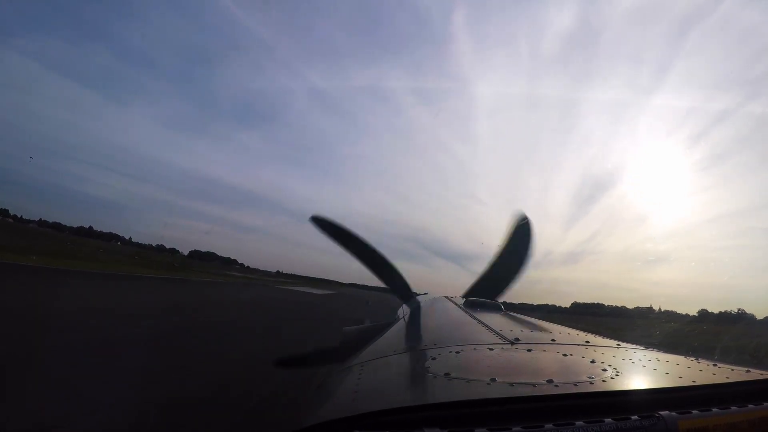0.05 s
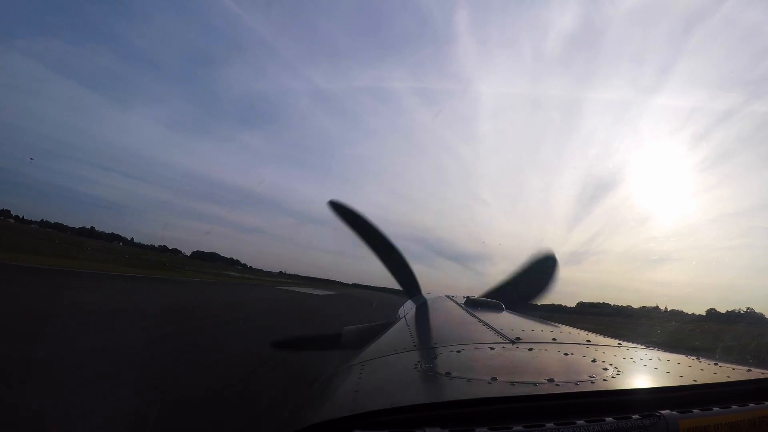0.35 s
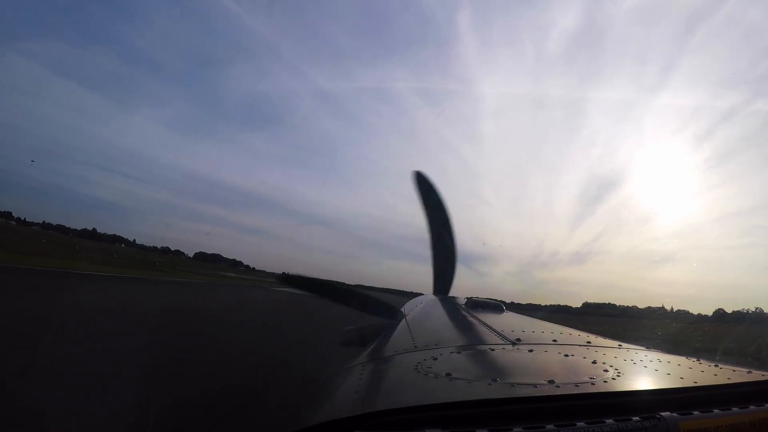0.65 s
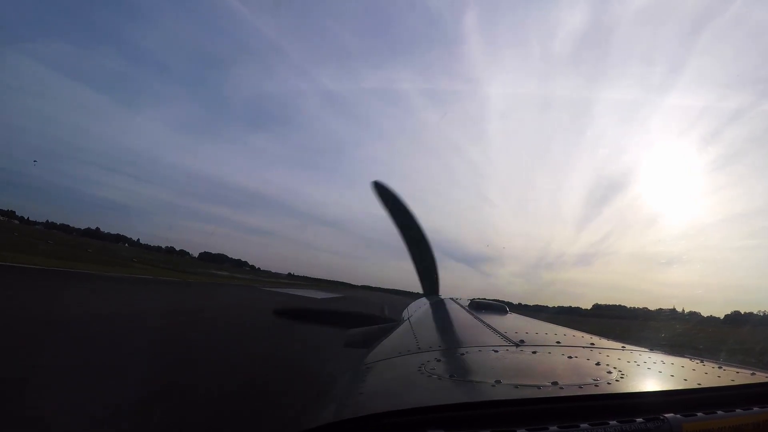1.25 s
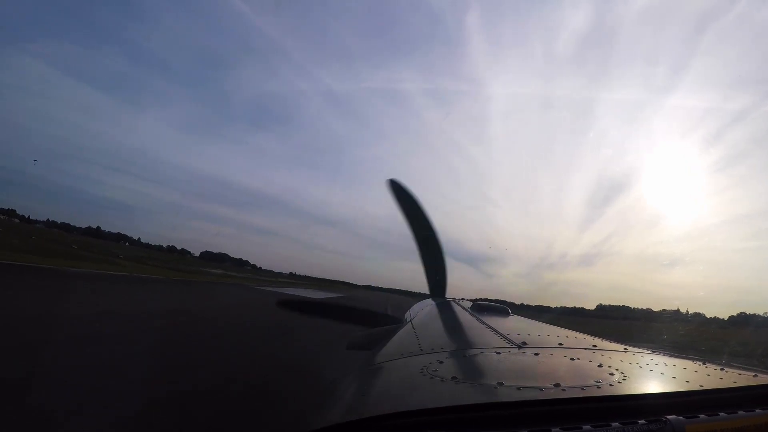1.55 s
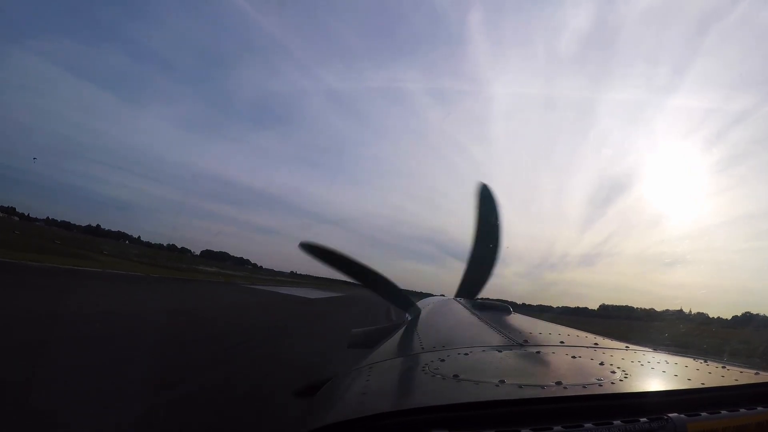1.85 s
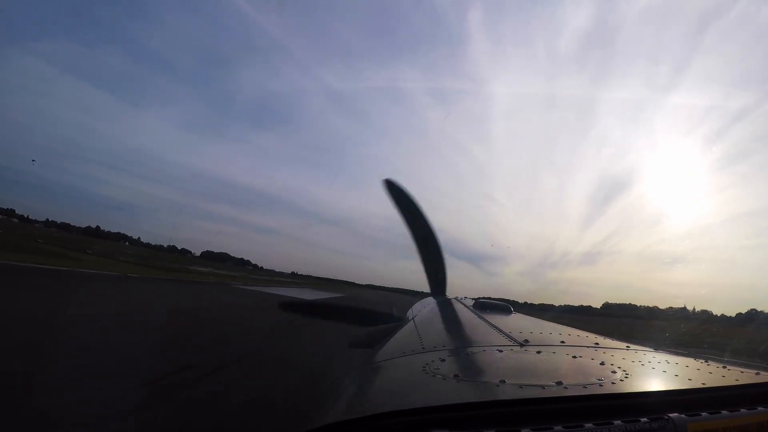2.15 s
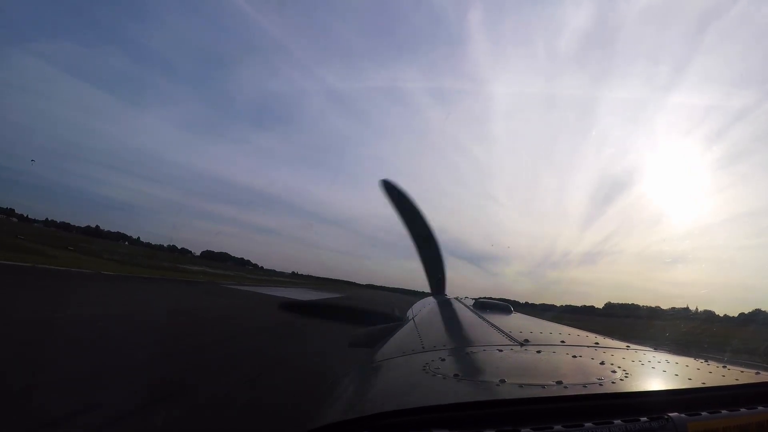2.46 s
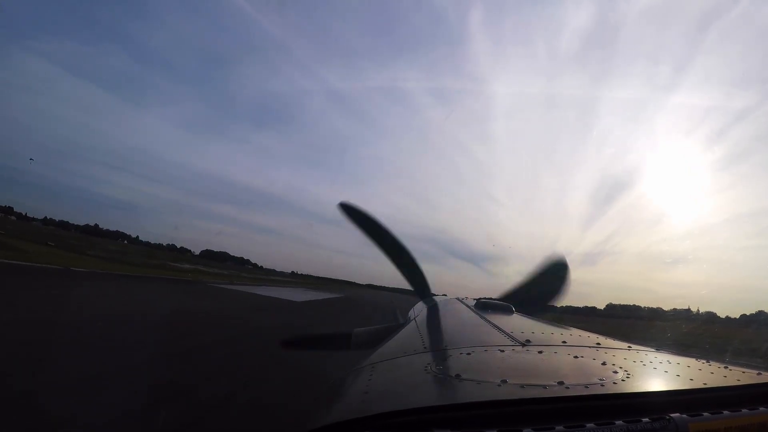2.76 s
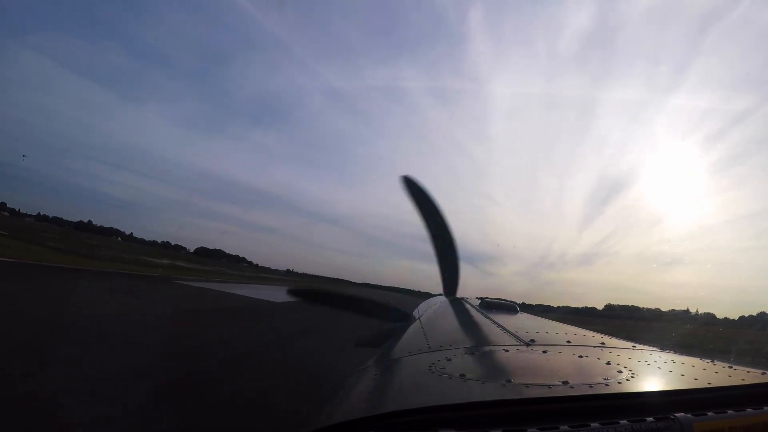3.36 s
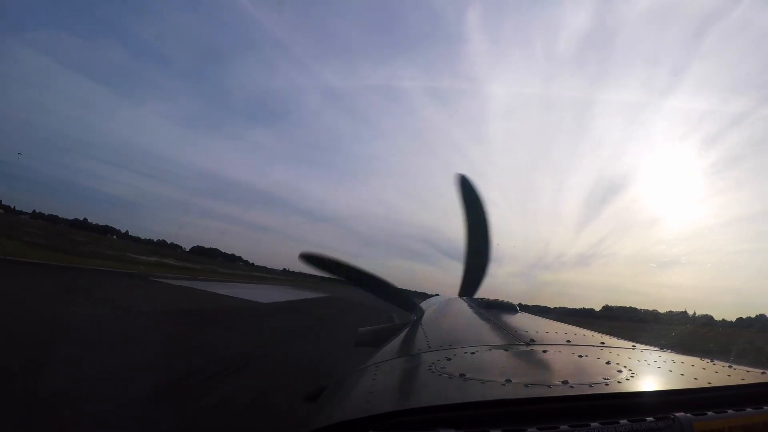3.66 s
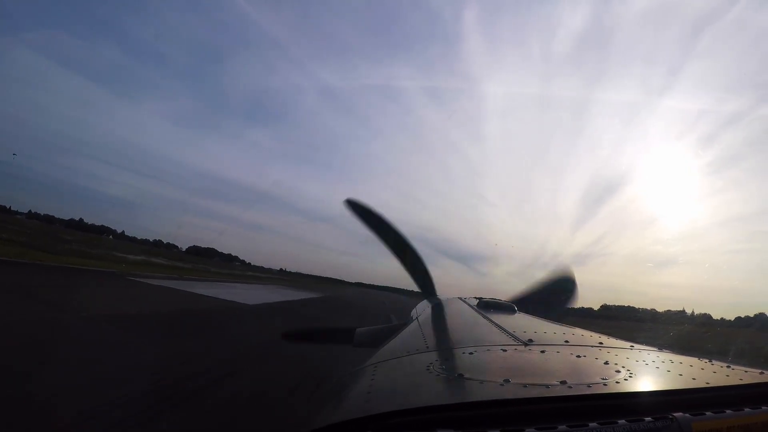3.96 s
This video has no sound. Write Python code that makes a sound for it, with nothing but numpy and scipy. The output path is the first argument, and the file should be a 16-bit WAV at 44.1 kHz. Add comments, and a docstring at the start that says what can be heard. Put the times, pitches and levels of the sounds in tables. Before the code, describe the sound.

A turboprop engine drones with a booming propeller roar and a thin high whine, heard inside the cockpit on a runway. The roar falls away past halfway, leaving rushing air, deep rumble, low bumps and a few short rattles.

```python
"""Cockpit of a turboprop rolling along a runway. Blade turbulence roars and sets the cabin booming
until the propeller load falls away at about 2.5 s, leaving low bumps, buffet and rushing air.
Above it the compressor whine rises and sinks on intake hiss, and the gearbox and power turbine
sing faintly. Short rattles come near the end; the strongest rings a panel."""
import sys
import numpy as np
from scipy import signal
from scipy.fft import rfft, irfft
from scipy.io import wavfile
from scipy.ndimage import uniform_filter1d, minimum_filter1d

SR = 44100
rng = np.random.default_rng(int(sys.argv[2]) if len(sys.argv) > 2 else 0)


def master(y):
    """Save y as 16-bit WAV."""
    cut = np.clip(np.atleast_2d(y).T, -1, 1)
    pcm = np.round(cut * 32767)  # scale
    wavfile.write(sys.argv[1], SR, pcm.astype(np.int16))


N = 176400
T = np.arange(N) / SR


def from_db(db):
    """Decibels to gain."""
    return 10 ** (np.asarray(db) / 20)


def unit_rms(x):
    """Scale to rms 1."""
    return x / np.sqrt(np.mean(x ** 2) + 1e-20)


def curve(rows):
    """Linear interpolation of (t/s, value) rows."""
    return np.interp(T, *np.transpose(rows))


def drift(rate_hz):
    """Unit-rms random wander, mostly below rate_hz."""
    hz = np.arange(N // 2 + 1) * SR / N
    return unit_rms(irfft(rfft(rng.standard_normal(N)) / (1 + (hz / rate_hz) ** 2), N))


def noise(spectrum):
    """Unit-rms noise shaped by (f/Hz, level/dB) rows, with steep skirts."""
    hz = np.maximum(np.arange(N // 2 + 1) * SR / N, 1)
    knots_hz, db = np.transpose(spectrum)
    shape = from_db(np.interp(np.log(hz), np.log(knots_hz), db))
    skirts = np.minimum(1, np.minimum(hz / knots_hz[0], knots_hz[-1] / hz)) ** 6
    return unit_rms(irfft(rfft(rng.standard_normal(N)) * skirts * shape, N))


def levelled(x, span_s):
    """Hold the running rms near 1 over span_s."""
    return x / np.sqrt(uniform_filter1d(x ** 2, int(span_s * SR)) + 1e-12)


def driven_mode(hz, width_hz):
    """Two-pole resonance, peak gain 1, driven by white noise."""
    return signal.lfilter(*signal.iirpeak(hz, hz / width_hz, fs=SR), rng.standard_normal(N))


def tone(hz, jitter, flutter_db, rate_hz):
    """Unit-rms tone; pitch and level waver in turbulent air."""
    phase = 2 * np.pi * np.cumsum(hz * (1 + jitter * drift(rate_hz))) / SR
    flutter = from_db(flutter_db * np.tanh(drift(rate_hz)))
    return unit_rms(np.sin(phase) * flutter)


def burst(start_s, attack_s=.0015, decay_s=.009):
    """Envelope: linear attack, exponential decay."""
    age_s = np.maximum(T - start_s, 0)
    return np.minimum(age_s / attack_s, 1) * np.exp(-np.maximum(age_s - attack_s, 0) / decay_s)


# Cabin resonances: f/Hz, width/Hz, level/dB
CABIN_MODES = [(159.8, 25, -4), (192, 23, -6), (222.3, 22.4, -5.5), (301.2, 30.6, -4), (338, 76, -14.5),
               (388, 26.3, -10), (471, 22, -12)]
# Roar envelope: t/s, level/dB
ROAR_DB = [(0, -13), (1.5, -13.5), (1.9, -12.5), (2.42, -13), (2.53, -19.5), (2.7, -29)]

def propeller_roar():
    """Turbulence off the loaded blades drives the cabin resonances."""
    modes = sum(from_db(db) * driven_mode(hz, width_hz) for hz, width_hz, db in CABIN_MODES)
    bandpass = signal.butter(4, [135, 560], "band", fs=SR, output="sos")
    return from_db(curve(ROAR_DB)) * levelled(signal.sosfilt(bandpass, modes), span_s=.12)


# Tearing-air envelope: t/s, level/dB
TEAR_DB = [(0, -26), (1.0, -29), (1.8, -25.5), (2.3, -24.5), (2.55, -21.5), (2.63, -28), (2.74, -31.5),
           (4, -67)]
# Its spectrum: f/Hz, level/dB
TEAR_SPECTRUM = [(250, -37), (500, 6), (600, -1), (680, -2.5), (740, 4.5), (830, 0.5), (930, -3.5),
                 (1200, -6), (1400, -10), (1560, -15), (1900, -29), (3500, -45.5)]

def blade_tear():
    """Air tears at the blades: midrange noise."""
    return from_db(curve(TEAR_DB) + 1.1 * drift(25)) * noise(TEAR_SPECTRUM)


# Low, middle and upper cabin booms: t/s, f/Hz, level/dB
LOW_BOOM = [(0, 170, -25), (.1, 169, -13.5), (.4, 166, -16), (.89, 164, -10.5), (.96, 162, -18),
            (1.14, 163, -16), (1.3, 163, -26), (1.58, 166, -17.5), (1.85, 168, -25), (2.06, 167, -13.5),
            (2.2, 165, -15.5), (2.6, 160, -60)]
MIDDLE_BOOM = [(0, 227, -20), (.35, 225, -26), (.52, 224, -17), (.88, 216, -24), (1.31, 212, -18.5),
               (1.6, 219, -23), (2.0, 220, -33), (2.45, 219, -20), (2.6, 215, -60)]
UPPER_BOOM = [(0, 305, -15), (.22, 283, -14), (.5, 283, -70)]

def cabin_booms():
    """Resonances boom almost as tones: the lower two in turn, the upper only at the start."""
    out = np.zeros(N)
    for rows in (LOW_BOOM, MIDDLE_BOOM, UPPER_BOOM):
        t_s, hz, db = np.transpose(rows)
        boom = tone(np.interp(T, t_s, hz), jitter=.016, flutter_db=3, rate_hz=13.4)
        out += from_db(np.interp(T, t_s, db)) * boom
    return out


# Rush envelope: t/s, level/dB
RUSH_DB = [(0, -22.5), (1.5, -20), (2.4, -18.5), (2.75, -19.5), (3.2, -16), (4, -15)]
# Its spectrum: f/Hz, level/dB
RUSH_SPECTRUM = [(60, -8), (85, -3), (118, 1.5), (147, -3.5), (185, -3.5), (212, -14.5), (245, -8),
                 (300, -5.5), (393, -9), (474, -11), (540, -24), (643, -21.5), (774, -18.5), (965, -25),
                 (1200, -22.5), (1380, -29.5), (1690, -31), (2250, -35.5), (3200, -42), (4000, -42)]

def air_rush():
    """Airflow and rolling noise fill the cabin."""
    return from_db(curve(RUSH_DB) + .73 * drift(15)) * levelled(noise(RUSH_SPECTRUM), span_s=.26)


# Buffet envelope: t/s, level/dB
BUFFET_DB = [(0, -20.5), (1.8, -19), (2.45, -17.5), (4, -17.5)]
# Its spectrum: f/Hz, level/dB
BUFFET_SPECTRUM = [(8, -31), (20, 4), (33, 3.5), (52, 2), (62, -7.5), (100, -20.5)]

def buffet():
    """Air buffets the airframe: deep rumble."""
    return from_db(curve(BUFFET_DB)) * levelled(noise(BUFFET_SPECTRUM), span_s=.066)


# Compressor blade rate: t/s, f/Hz
BLADE_HZ = [(0, 5862), (.3, 6060), (.6, 6265), (.9, 6508), (1.2, 6764), (1.5, 6953), (1.8, 7038),
            (2.0, 7017), (2.15, 6886), (2.35, 6700), (2.6, 6496), (2.9, 6304), (3.2, 6143), (3.45, 6024),
            (3.7, 5906), (4, 5807)]
# Whine and octave envelopes: t/s, level/dB
WHINE_DB = [(0, -43), (2.55, -44), (2.84, -37.5), (2.93, -44), (3.0, -39), (3.18, -37.5), (3.28, -43),
            (3.42, -29.5), (3.48, -37), (3.53, -29.5), (3.63, -35), (3.88, -32), (3.93, -42), (4, -31.5)]
OCTAVE_DB = [(0, -71), (1.5, -69), (3.1, -62), (4, -67)]

def compressor():
    """The blades whine at their passing rate and its octave."""
    blade_hz = curve(BLADE_HZ)
    whine = tone(blade_hz, jitter=.002, flutter_db=5.5, rate_hz=30)
    octave = tone(2 * blade_hz, jitter=.005, flutter_db=6, rate_hz=40)
    return from_db(curve(WHINE_DB)) * whine + from_db(curve(OCTAVE_DB)) * octave


# Gear mesh rate, following propeller speed: t/s, f/Hz
MESH_HZ = [(0, 1490), (1.3, 1495), (1.8, 1517), (2.15, 1528), (2.35, 1552), (2.6, 1615), (3.0, 1675),
           (3.45, 1713), (4, 1738)]
# Gear and turbine envelopes: t/s, level/dB
GEAR_DB = [(0, -55), (1.75, -50), (2.05, -41), (2.35, -56), (2.8, -61), (3.2, -41.5), (3.55, -48),
           (4, -43.5)]
TURBINE_DB = [(0, -55), (2.1, -51), (2.27, -41), (2.4, -49), (4, -56)]

def drivetrain():
    """Gear mesh and power turbine sing at a constant ratio, both geared to the propeller."""
    mesh_hz = curve(MESH_HZ)
    gear = tone(mesh_hz, jitter=.00126, flutter_db=5.5, rate_hz=8.3)
    turbine = tone(3.89 * mesh_hz, jitter=.00226, flutter_db=9, rate_hz=28)
    return from_db(curve(GEAR_DB)) * gear + from_db(curve(TURBINE_DB)) * turbine


# Hiss envelope: t/s, level/dB
HISS_DB = [(0, -38.5), (.9, -39), (1.5, -37.5), (1.9, -34.5), (2.3, -36.5), (3.1, -35.5), (3.45, -31.5),
           (3.7, -33), (4, -33.5)]
# Its spectrum: f/Hz, level/dB
HISS_SPECTRUM = [(2000, -30), (3000, -21.5), (3500, -33), (4260, -12.5), (5500, -0.5), (6050, -1),
                 (7070, -6.5), (7660, -10.5), (8830, -15.5), (10200, -24.5), (11500, -36), (12100, -24),
                 (12700, -25.5), (15200, -31)]

def intake_hiss():
    """The engine intake hisses with a slight flicker."""
    return from_db(curve(HISS_DB) + drift(33)) * noise(HISS_SPECTRUM)


# Airframe bumps: t/s, f/Hz, level/dB
BUMPS = [(2.58, 35, -12), (2.75, 36, -12.5), (2.98, 43, -15.5), (3.2, 42, -14.5), (3.44, 37, -17.5),
         (3.76, 37, -15)]

def bumps(length_s=.2):
    """Each bump swings the airframe for a few cycles that swell and fade."""
    out = np.zeros(N)
    for start_s, hz, db in BUMPS:
        swell = np.sin(np.pi * np.clip((T - start_s) / length_s, 0, 1))
        swing = np.sqrt(2) * np.sin(2 * np.pi * (hz * T + rng.random()))
        out += from_db(db) * swell * swing
    return out


# Rattle strikes: t/s, level/dB
RATTLES = [(2.96, -39), (3.279, -33), (3.285, -26.5), (3.361, -32), (3.442, -25.5), (3.451, -32),
           (3.506, -30), (3.658, -32), (3.843, -31), (3.922, -33), (3.958, -32)]
# Their spectrum: f/Hz, level/dB
RATTLE_SPECTRUM = [(2000, -4), (3500, 1), (4500, 6), (6000, 12), (8800, 1), (11300, -13), (13000, -7.5),
                   (15000, -15)]

def rattles():
    """Short dry bursts of grainy noise."""
    crackle = unit_rms(noise(RATTLE_SPECTRUM) * from_db(3 * np.tanh(drift(700))))
    return crackle * sum(from_db(db) * burst(start_s) for start_s, db in RATTLES)


def panel_ring():
    """A panel rings briefly at the strongest rattle."""
    return from_db(-26) * burst(start_s=3.446) * unit_rms(driven_mode(hz=1430, width_hz=65))


def scene():
    """Mono sum at one cockpit microphone."""
    propeller = propeller_roar() + blade_tear() + cabin_booms()
    airframe = air_rush() + buffet() + bumps()
    engine = compressor() + drivetrain() + intake_hiss()
    return (propeller + airframe + engine + rattles() + panel_ring())[None]


def record(dry):
    """Look-ahead peak limiter, then a steep low-pass."""
    ceiling, span_samples, cutoff_hz = .91, SR // 80, 15250
    max_gain = np.minimum(1, ceiling / (np.abs(dry) + 1e-9))
    gain = uniform_filter1d(minimum_filter1d(max_gain, span_samples), span_samples)
    lowpass = signal.ellip(12, .1, 80, cutoff_hz, fs=SR, output="sos")
    return signal.sosfilt(lowpass, dry * gain)


dry = scene()
out = record(dry)
master(out)
```